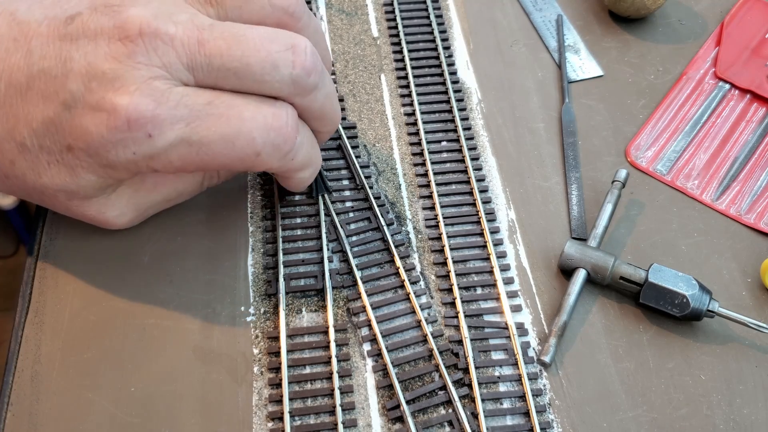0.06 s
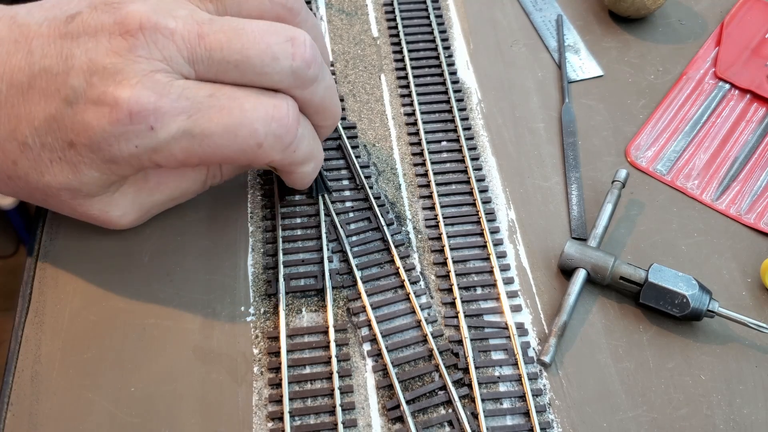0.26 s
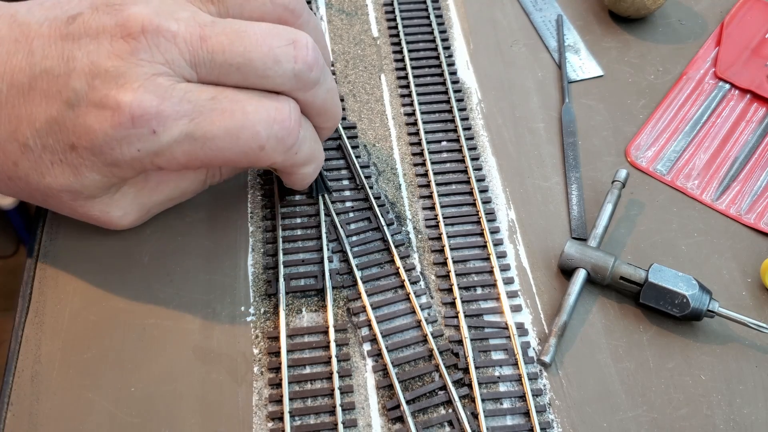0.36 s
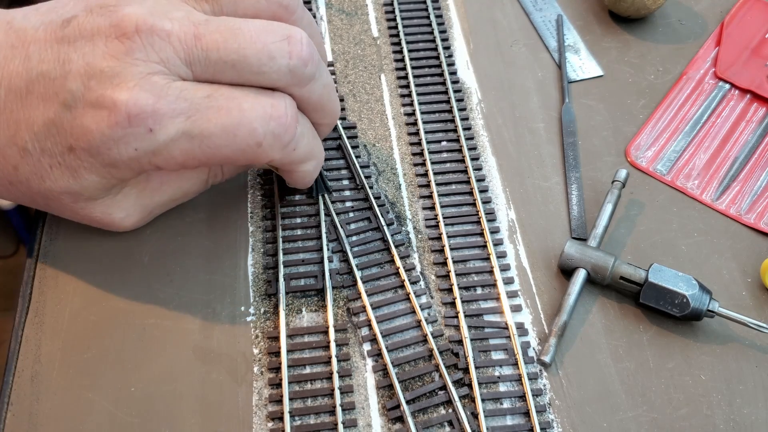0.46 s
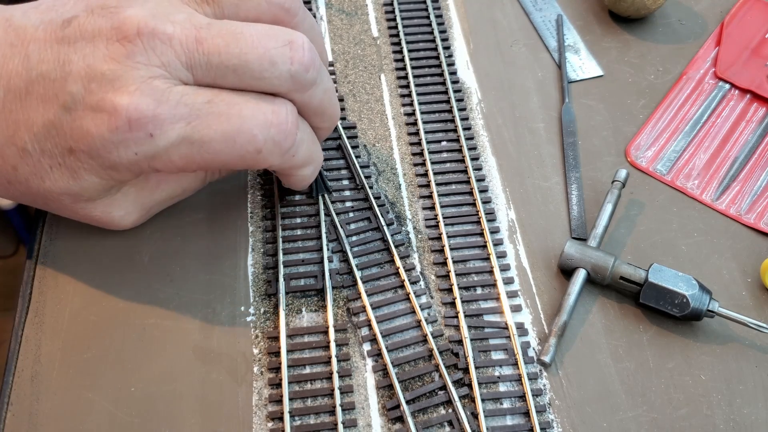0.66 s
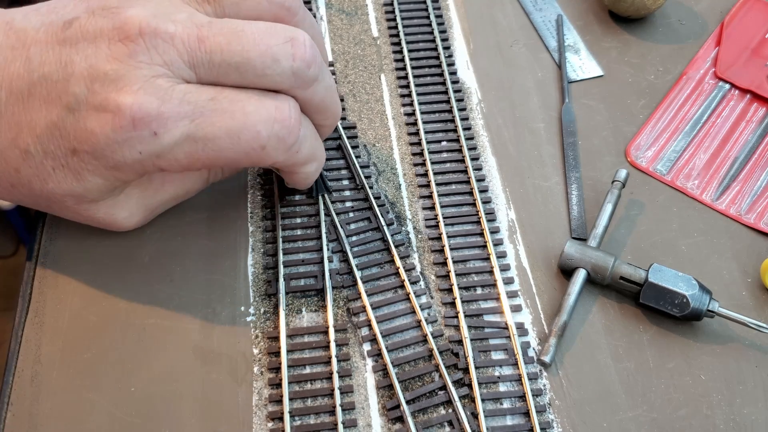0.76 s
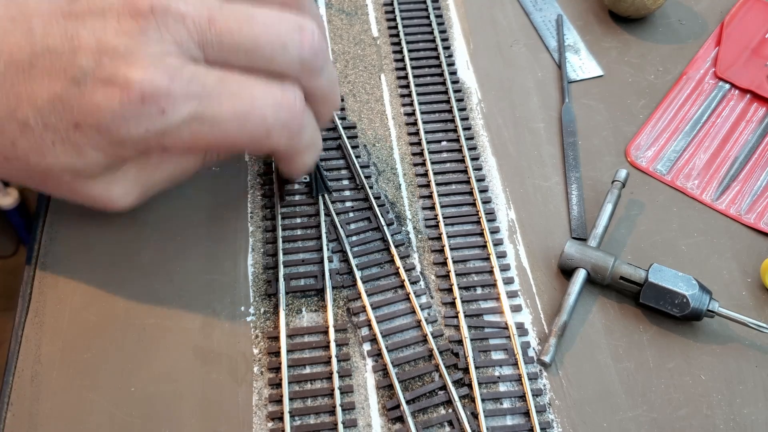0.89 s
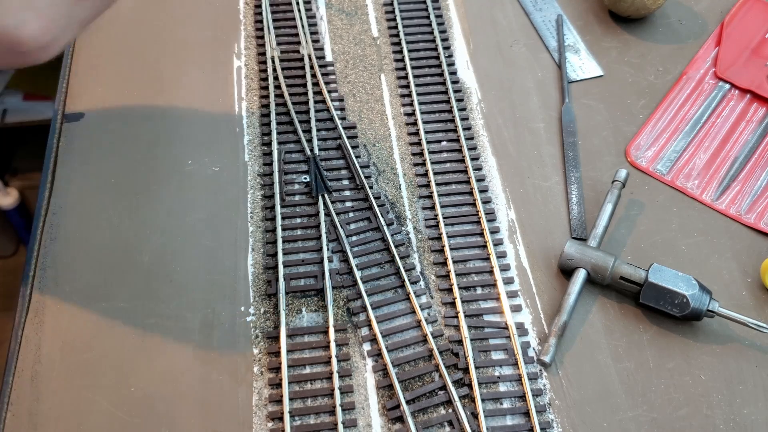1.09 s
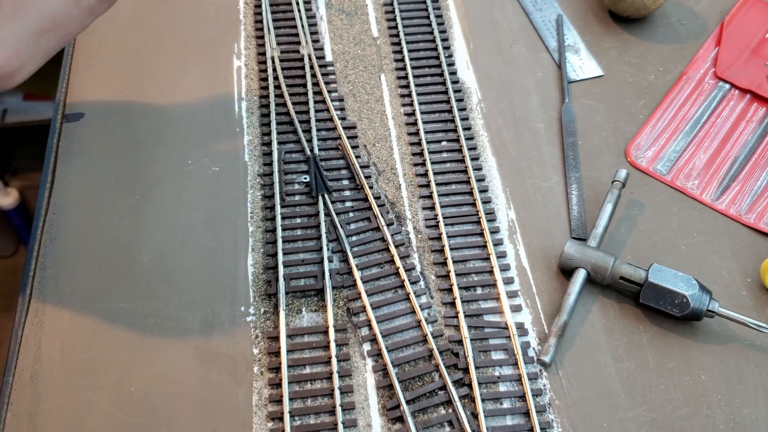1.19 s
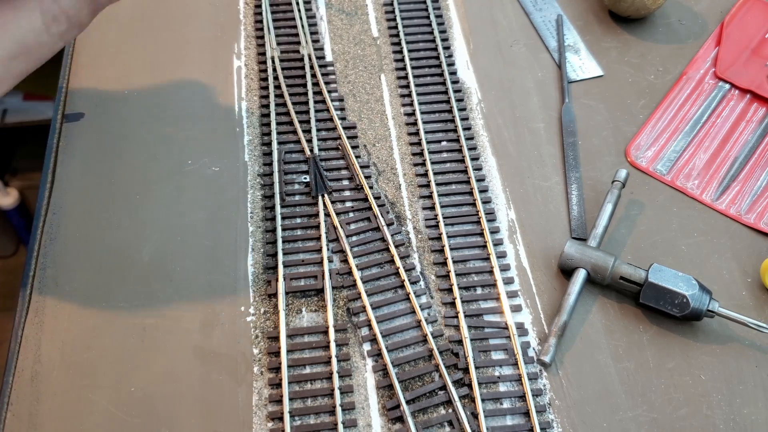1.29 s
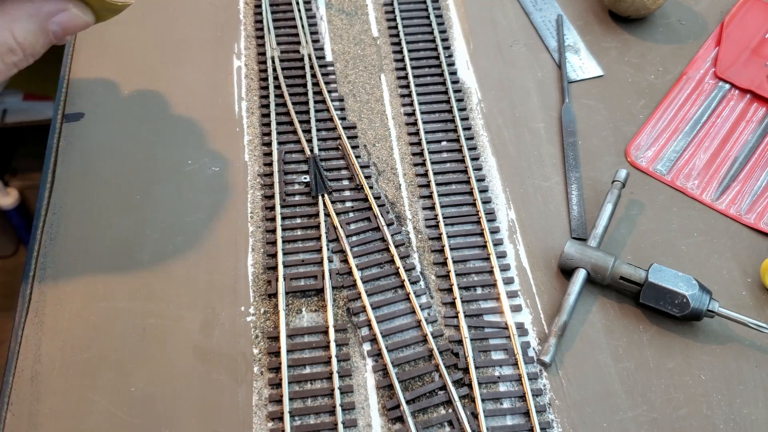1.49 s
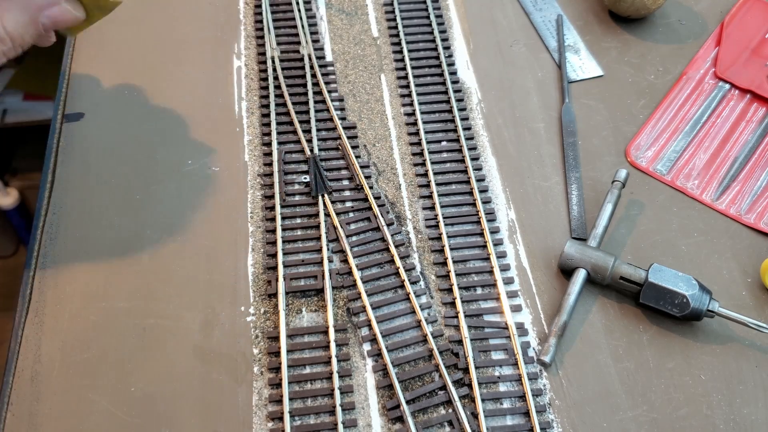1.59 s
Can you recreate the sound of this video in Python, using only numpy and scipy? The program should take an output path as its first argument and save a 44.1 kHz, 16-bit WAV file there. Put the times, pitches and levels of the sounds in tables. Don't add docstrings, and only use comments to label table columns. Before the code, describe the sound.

Short, dry sandpaper scrapes on a small metal rail over a hollow tabletop, ending in a quick swipe.

```python
import sys
import numpy as np
from scipy import signal
from scipy.fft import rfft, irfft
from scipy.io import wavfile
from scipy.ndimage import uniform_filter1d

SR = 44100
rng = np.random.default_rng(int(sys.argv[2]) if len(sys.argv) > 2 else 0)


def generate_wav(sig):
    pcm = np.round(np.clip(np.atleast_2d(sig).T, -1, 1) * 32767).astype(np.int16)
    wavfile.write(sys.argv[1], SR, pcm)


def to_linear_factor(level_db):
    exponent = np.asarray(level_db, float) / 20
    return 10 ** exponent


N = 72765
LAST_PUSH_S = 0.8552


def evened(x):
    return x / np.sqrt(np.mean(x ** 2) + 1e-20)


def read(points, hz):
    f, value = np.transpose(points)
    return np.interp(np.log(hz + 1), np.log(f + 1), value)


def coloured(x, points):
    gain = to_linear_factor(read(points, np.fft.rfftfreq(len(x), 1 / SR)))
    return evened(irfft(rfft(x) * gain, len(x)))


def resonate(x, peaks, order=1):
    out = np.zeros(len(x))
    for k, (hz, width_hz, db) in enumerate(peaks):
        r = np.exp(-np.pi * width_hz / SR)
        pair = [1 - r, 0, r * r - r, 1, -2 * r * np.cos(2 * np.pi * hz / SR), r * r]
        rung = signal.sosfilt([pair] * order, x) / np.sqrt(1 - r)
        out += (-1) ** k * to_linear_factor(db) * rung
    return out


def ring(start_s, modes):
    t = np.maximum(np.arange(N) / SR - start_s, 0)
    return sum((-1) ** k * to_linear_factor(db - 60 * t / t60) * np.sin(2 * np.pi * hz * t)
               for k, (hz, db, t60) in enumerate(modes))


def catches(per_s, spread_db):
    hardness = to_linear_factor(spread_db * np.minimum(rng.exponential(1, N), 4))
    size = hardness * rng.standard_normal(N)
    return evened(size * (rng.random(N) < per_s / SR))


def push(start_s, length_s):
    rise_s, fade_db = 0.008, -18.5
    since = np.arange(N) / SR - start_s
    return np.clip(since / rise_s, 0, 1) * to_linear_factor(fade_db * (since / length_s) ** 2)


def jolts(column):
    # start_s, board_db, rail_db, grit_db
    hard_catches = [(.027, -50, -47, -48), (.0335, -38, -41, -42), (.038, -31, -55, -50),
                    (.055, -45, -42, -55), (.0605, -31, -60, -60), (.0665, -45, -41, -55),
                    (.1645, -46, -47, -60), (.1752, -33, -37, -32), (.321, -42, -45, -48),
                    (.3325, -30, -38, -43), (.4505, -45, -50, -46), (.4565, -34, -50, -43),
                    (.477, -39, -60, -60), (.5815, -46, -46, -47), (.5875, -37, -38, -52),
                    (.597, -37, -52, -55), (.6075, -32, -47, -46), (.622, -39, -50, -54),
                    (.7258, -33, -38, -39), (.7365, -32, -40, -43), (LAST_PUSH_S, -31, -42, -44),
                    (.8605, -32, -52, -52), (.8785, -34, -47, -56), (.8985, -41, -47, -58),
                    (.9202, -34, -44, -44), (.9275, -36, -47, -50)]
    out = np.zeros(N)
    for row in hard_catches:
        out[round(row[0] * SR)] = to_linear_factor(row[column])
    return out


def strokes():
    # start_s, length_s, board_db, rail_db, grit_db
    pushes = [
        (0.021, 0.08, -52, -52, -53),
        (0.163, 0.05, -55, -58, -54),
        (0.312, 0.055, -50, -48, -53),
        (0.66, 0.04, -52, -56, -71),
        (0.8, 0.075, -55.5, -54, -62),
        (0.716, 0.055, -55, -57, -66),
        (LAST_PUSH_S, 0.068, -54, -55, -64),
        (0.919, 0.025, -54, -50, -54),
    ]
    # centre_hz, width_hz, level_db
    board_peaks = [(319, 66, -5.5), (468, 42, -19), (545, 43, -17), (245, 45, -18)]
    # centre_hz, width_hz, level_db
    rail_peaks = [(733.4, 53, -5.5), (861, 59, -12), (1048, 116, -1.5), (1227, 122, 1), (1387, 120, -7),
                  (1620, 78, -12.5), (1840, 180, -13), (593, 79, -13.5), (2320, 320, -20), (2800, 270, -26)]
    # pitch_hz, density_db (per Hz)
    grit_tone = [(120, -30), (500, -6), (1200, -2.5), (2200, 4), (4000, -14), (7000, -4.5), (8300, -20),
                 (15500, -17)]
    board_lag_s, spray_fade_s = 0.0048, 0.0091

    drive = catches(1500, 2.5) + 0.71 * rng.standard_normal(N)
    hiss = coloured(catches(6000, 3.0), grit_tone)
    board_push, rail_push, grit_push = np.zeros((3, N))
    for start_s, length_s, board_db, rail_db, grit_db in pushes:
        board_push += to_linear_factor(board_db) * push(start_s + board_lag_s, length_s)
        rail_push += to_linear_factor(rail_db) * push(start_s, 0.52 * length_s)
        grit_push += to_linear_factor(grit_db) * push(start_s, 0.85 * length_s)

    board = board_push * drive + 8 * jolts(1)
    rail = rail_push * drive + 6 * jolts(2)
    spray = signal.lfilter([0.2], [1, -np.exp(-1 / (spray_fade_s * SR))], jolts(3))
    grit = (grit_push + spray) * hiss
    return resonate(board, board_peaks, order=2), resonate(rail, rail_peaks, order=2) + grit


def snaps():
    # start_s, low_db, high_db, top_db, ping_db
    snap_times = [
        (0.22145, -21.5, -19.5, -28.5, -35),
        (.28105, -32, -30, -45, -20),
    ]
    # pitch_hz, level_db, t60_s
    low_modes = [(321, -27.5, .03), (538, -17.5, 0.012), (726, -16, 0.054), (1250, -2.5, 0.0081),
                 (1610, -11.5, 0.049), (2155, 3.5, 0.0046), (2910, 1.5, 0.0065), (3530, -2.5, 0.0053)]
    # pitch_hz, level_db, t60_s
    high_modes = [(4300, -6.5, 0.0048), (5470, 0.5, 0.0048), (6360, -1, 0.0043), (7415, -6.5, 0.0092),
                  (8320, -5.5, 0.0038)]
    # pitch_hz, level_db, t60_s
    top_modes = [(9820, -3, 0.0036), (11500, 0, 0.0043), (13300, -2.5, .004), (15000, -1, .004)]
    # pitch_hz, level_db, t60_s
    ping_modes = [(4920, 0, .0035), (5750, -5, .003), (6600, -3, .003)]
    out = np.zeros(N)
    for start_s, *levels_db in snap_times:
        for level_db, modes in zip(levels_db, (low_modes, high_modes, top_modes, ping_modes)):
            out += to_linear_factor(level_db) * ring(start_s, modes)
    return out


def glide(x):
    # time_s, pitch_hz
    rise = [(.925, 500), (.943, 1000), (.952, 1660), (.964, 2160), (1.0, 2380)]
    width_hz = 180
    s, hz = np.transpose(rise)
    pitch_hz = np.interp(np.arange(N) / SR, s, hz)
    turn = np.exp(2j * np.pi * np.cumsum(pitch_hz) / SR)
    r = np.exp(-np.pi * width_hz / SR)
    smooth = signal.lfilter([1 - r], [1, -r], x / turn)
    return evened((turn * smooth).real)


def swipe():
    # time_s, level_db
    pressure = [(0.914, -67), (0.922, -59), (.939, -52), (0.9505, -41), (.967, -50), (.998, -72),
                (1.041, -90)]
    # pitch_hz, density_db (per Hz)
    scrape_tone = [(180, -27), (500, -10), (1000, -3.5), (1640, 3.5), (2500, -3), (3100, 2.5), (4370, -6),
                   (16000, -14.5)]
    # centre_hz, width_hz, level_db
    scrape_peaks = [(950, 62, -6), (1160, 42, -5), (1630, 95, 0), (2110, 125, 5), (3110, 125, 5),
                    (4160, 105, 0), (6910, 330, 3)]
    # start_s, length_s, level_db
    rustle_moves = [
        (1.13, 0.051, -68),
        (1.365, 0.1, -66.5),
    ]
    # pitch_hz, density_db (per Hz)
    rustle_tone = [(2500, -25), (4500, -4), (7000, 0), (8500, -8), (11000, -8), (15500, -4)]
    # pitch_hz, level_db, t60_s
    tick_modes = [(3000, 0, .02), (3600, -2, .015), (2400, -12, .008), (5500, -10, .004)]
    ring_db, glide_db, tick_s, tick_db = -5, -4.5, 1.1385, -51

    t = np.arange(N) / SR
    grit = catches(4000, 0.86)
    body = coloured(grit, scrape_tone)
    body = body + to_linear_factor(ring_db) * evened(resonate(grit, scrape_peaks))
    body = body + to_linear_factor(glide_db) * glide(grit)
    s, db = np.transpose(pressure)
    scrape = to_linear_factor(np.interp(t, s, db, -120, -120)) * body

    rustle = np.zeros(N)
    for start_s, length_s, level_db in rustle_moves:
        rustle += to_linear_factor(level_db) * np.sin(np.pi * np.clip((t - start_s) / length_s, 0, 1))
    return scrape + rustle * coloured(grit, rustle_tone) + to_linear_factor(tick_db) * ring(tick_s, tick_modes)


def heard(x, room_db, near_db, left_db, lag):
    # pitch_hz, t60_s
    room_decay = [(300, 0.37), (1500, 0.24), (5000, 0.22), (9000, 0.21), (15000, 0.09)]
    near_fade_s, count = 0.0052, SR // 2
    taps = np.zeros((2, count))
    at = np.arange(24, count - 20, 20)
    at = at + rng.integers(0, 20, (2, len(at)))
    np.put_along_axis(taps, at, rng.choice([-1., 1.], at.shape), 1)
    near = taps * np.exp(-np.arange(count) / SR / near_fade_s)

    hz, t, z = signal.stft(taps, SR, nperseg=256)
    decay = to_linear_factor(-60 * t / read(room_decay, hz)[:, None])
    tail = signal.istft(z * decay, SR, nperseg=256)[1][:, :count]

    path = to_linear_factor(room_db) * tail / np.linalg.norm(tail[0])
    path = path + to_linear_factor(near_db) * near / np.linalg.norm(near[0])
    path[0, 0] += 1
    path[1, lag] += 1
    balance = to_linear_factor([[left_db / 2], [-left_db / 2]])
    return signal.fftconvolve(x[None], path, axes=1)[:, :N] * balance


def hum():
    # pitch_hz, density_db (per Hz)
    hum_tone = [(140, -24), (280, 2), (560, -8), (1000, -12), (1700, -10), (6800, -19), (9300, -30),
                (15700, -20)]
    # pitch_hz, likeness (0 to 1)
    likeness = [(30, 0.95), (180, 1), (400, 0.087), (2000, 0.44), (16000, 0.11)]
    level_db, waver_db = -67.5, 2.27
    frames, hz = N // 256 + 5, np.fft.rfftfreq(1024, 1 / SR)
    a, b, c, d, patches = rng.standard_normal((frames, 513, 5)).T
    patches = evened(uniform_filter1d(uniform_filter1d(patches, 10, 0), 10, 1))
    same = np.clip(read(likeness, hz), -1, 1)[:, None]
    left = a + 1j * b
    right = same * left + np.sqrt(1 - same ** 2) * (c + 1j * d)
    z = np.array([left, right]) * to_linear_factor(read(hum_tone, hz)[:, None] + waver_db * patches)
    return to_linear_factor(level_db) * evened(signal.istft(z, nperseg=1024, noverlap=768)[1][:, :N])


def rumble():
    # time_s, level_db
    swell = [(0.0, -59.5), (0.118, -60.5), (1.65, -66.5)]
    # centre_hz, width_hz, level_db
    lines = [(30, 81, -37), (51, 25, -2), (85.64, 8.7, -2), (116.3, 16.6, -6), (144.6, 22.6, -5)]
    side_db = -13
    s, db = np.transpose(swell)
    mid, side = (evened(resonate(v, lines, order=2)) for v in rng.standard_normal((2, N)))
    both = mid + to_linear_factor(side_db) * np.array([side, -side])
    return to_linear_factor(np.interp(np.arange(N) / SR, s, db)) * both


def whine():
    peak = [(15800, 160, 0)]  # centre_hz, width_hz, level_db
    ports = [evened(resonate(v, peak, order=2)) for v in rng.standard_normal((2, N))]
    return to_linear_factor(-84) * np.array(ports)


def scene():
    room_db = -5.5
    board, rail = strokes()
    table = heard(board, room_db - 4.5, -12.0, left_db=6, lag=14)
    metal = heard(rail, room_db - 5.0, -9.5, left_db=0.8, lag=10)
    last_pass = heard(swipe(), room_db, -0.58, left_db=1.2, lag=22)
    jumps = heard(snaps(), -3, -6, left_db=1.3, lag=7)
    return table + metal + last_pass + jumps + hum() + rumble() + whine()


def top_cut(x):
    return signal.sosfilt(signal.butter(12, 16650, fs=SR, output="sos"), x)


def record(dry):
    low_pass = signal.firwin(255, 16000, window=("kaiser", 7), fs=SR)
    dull = signal.oaconvolve(dry, low_pass[None], "same")
    return top_cut(dull)


dry = scene()
out = record(dry)
generate_wav(out)
```